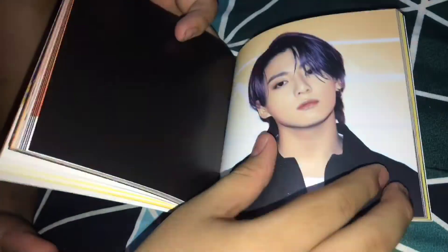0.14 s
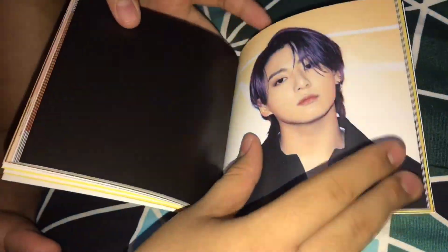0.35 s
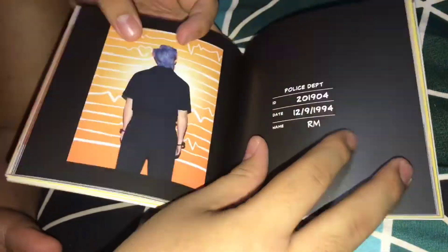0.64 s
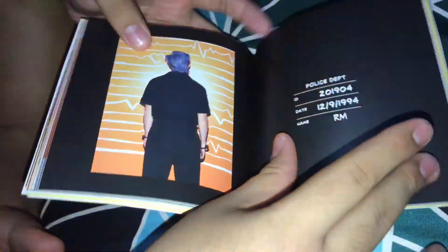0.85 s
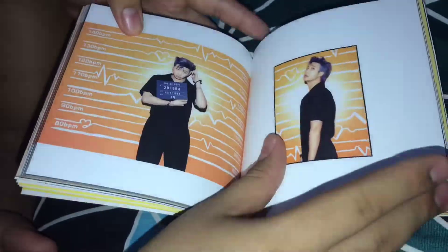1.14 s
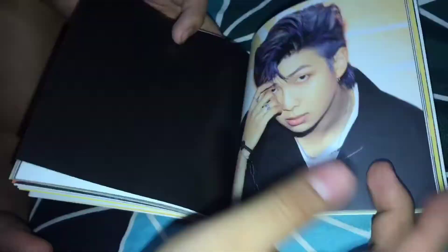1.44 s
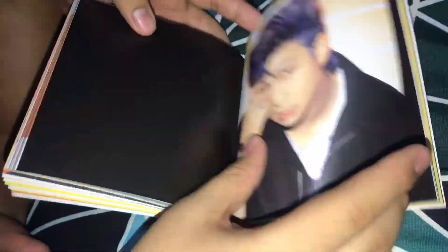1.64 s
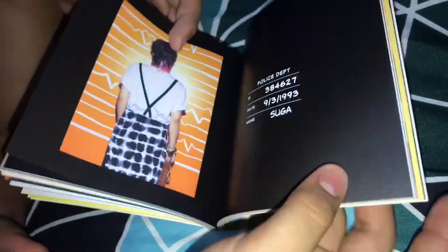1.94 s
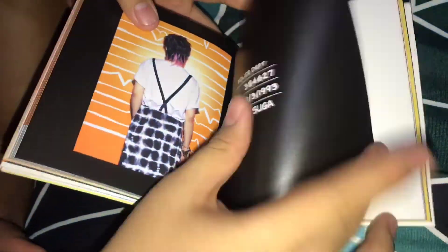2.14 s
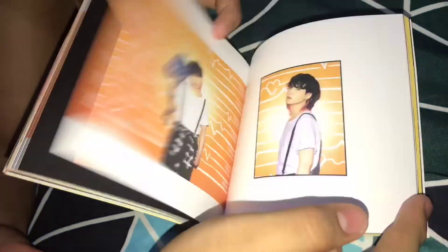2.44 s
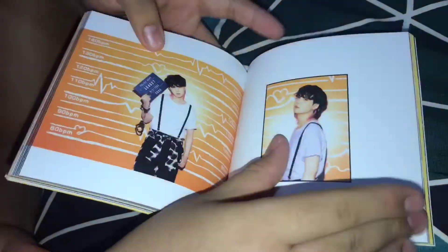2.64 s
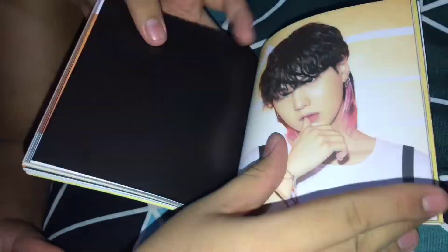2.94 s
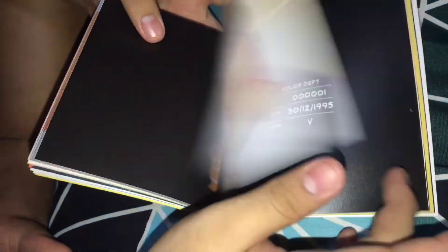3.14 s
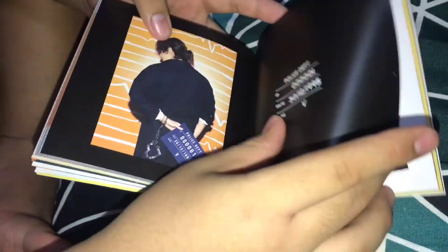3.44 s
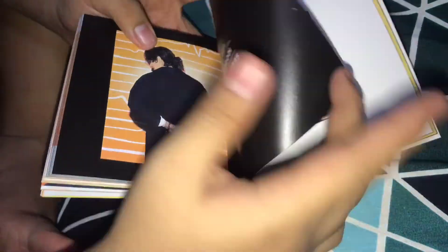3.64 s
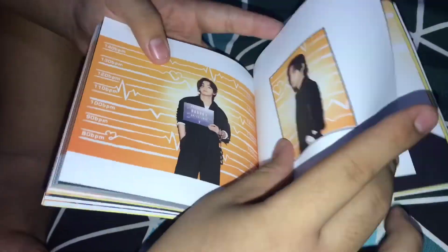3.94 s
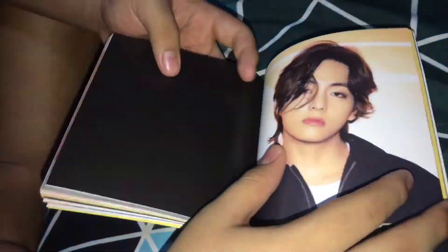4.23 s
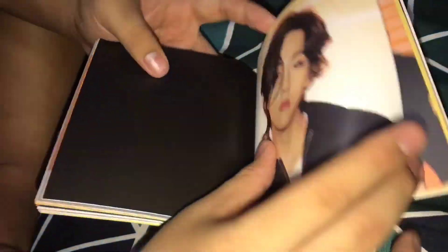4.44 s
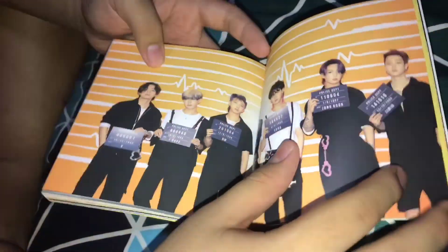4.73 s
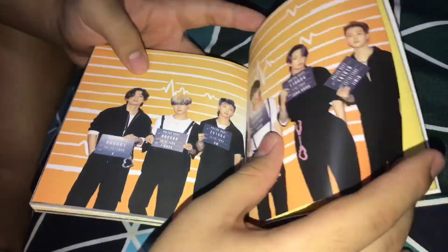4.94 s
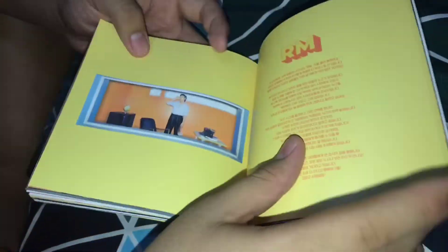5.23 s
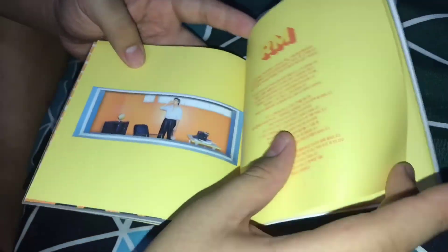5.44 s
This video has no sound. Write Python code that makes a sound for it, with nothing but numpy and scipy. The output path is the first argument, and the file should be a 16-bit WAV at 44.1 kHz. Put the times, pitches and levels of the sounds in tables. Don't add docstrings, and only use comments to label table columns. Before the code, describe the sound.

Stiff glossy book pages are flipped quickly by hand, with short rubs, crisp snaps and soft flops over a low fan rumble.

```python
import sys
import numpy as np
from scipy import signal
from scipy.fft import rfft, irfft
from scipy.io import wavfile
from scipy.ndimage import uniform_filter1d

SR = 44100
rng = np.random.default_rng(int(sys.argv[2]) if len(sys.argv) > 2 else 0)


def transcribe(signal):
    frames = np.atleast_2d(signal).T
    limited = np.clip(frames, -1, 1)
    pcm = np.round(limited * 32767).astype(np.int16)
    wavfile.write(sys.argv[1], SR, pcm)


def voltage_ratio(level):
    return 10 ** (np.asarray(level, float) / 20)


N = 245637

# centre_s, level_db, half_length_s, bend_db
THUMB_GRIPS = [(0.394, -46, .014, -1.5), (0.876, -46, .011, -2), (0.902, -47.5, 0.012, -15),
               (0.964, -44, .014, -1), (1.292, -44, .014, -9), (1.3, -55.5, .03, 0),
               (1.429, -51, .017, -2.5), (1.732, -48.5, 0.021, -10), (1.84, -47.5, 0.014, -18),
               (2.114, -45.5, .008, -5), (2.13, -50, .011, 0), (2.145, -43.5, 0.0085, -8),
               (2.156, -50, 0.0079, -9), (2.253, -43.5, 0.011, -18), (2.711, -47.5, 0.03, -3),
               (2.807, -52, .013, -7), (2.823, -49.5, .006, -1), (3.074, -42.5, .009, -3.5),
               (3.103, -52, .025, -2), (3.915, -47, .014, -8), (3.959, -44, .014, -8),
               (3.982, -54, 0.019, -4), (4.036, -55.5, 0.046, -10), (4.335, -49.5, 0.012, -0.5),
               (4.412, -55.5, 0.025, -3), (5.012, -51, 0.015, -1), (5.37, -46, 0.011, -3.5),
               (5.444, -51.5, 0.009, 0), (5.466, -51, 0.015, -1.5), (5.496, -47, 0.014, -6)]
# centre_s, level_db, half_length_s, bend_db
EDGE_FLICKS = [(.107, -48.5, 0.015, -12), (.43, -50, 0.014, -14), (0.471, -52, 0.027, -13),
               (0.505, -49.5, 0.0076, -15), (.516, -48, 0.0031, -15), (0.523, -47.5, .009, -16),
               (0.561, -52, 0.019, -20), (1, -44.5, 0.015, -20), (1.366, -53, .01, -23),
               (1.471, -51.5, .016, -13), (1.61, -44.5, 0.0078, -0.5), (1.644, -54, .012, 2.5),
               (1.66, -55, 0.019, -19), (1.784, -53, .007, -9), (1.939, -45.5, 0.0056, -16),
               (2.427, -52.5, 0.022, -10), (2.452, -53, 0.0046, -6), (2.493, -52.5, 0.015, -24),
               (2.745, -48, .005, -7), (2.843, -54, 0.032, -13), (3.398, -43.5, 0.004, -17),
               (3.611, -48, 0.0041, -12), (4.128, -56.5, 0.051, -9), (4.153, -50, .013, -19),
               (4.521, -47.5, 0.01, -8), (4.596, -52.5, .011, -17), (4.615, -49.5, 0.0043, -11),
               (4.627, -47, .003, -13), (4.877, -48, 0.011, -5), (5.092, -50, .014, -14)]
# centre_s, level_db, half_length_s, bend_db, sheet_hz
SHEET_CREASES = [(0.052, -44.5, 0.015, -24, 3170), (2.247, -48.5, .004, -10, 2900),
                 (2.867, -43, 0.013, -19, 3400), (3.168, -46.5, 0.016, 0.5, 3140),
                 (3.21, -49, .016, -30, 2960), (3.621, -41.5, 0.0061, -12, 2950),
                 (3.628, -48, .003, -16, 2910), (3.658, -52.5, .0065, -13, 2780),
                 (3.682, -44.5, 0.011, -6, 3120), (3.696, -44.5, .0065, -8, 2910),
                 (4.892, -48, 0.0044, -6, 2660), (5.035, -44.5, 0.0095, -12, 3200),
                 (5.113, -42.5, .011, -12, 3120), (5.151, -46, 0.017, -25, 3300),
                 (5.547, -47.5, 0.025, -6, 3080), (5.55, -50.5, .012, -7, 2700)]
# centre_s, level_db, half_length_s, bend_db, gloss_db
SKIN_SKIMS = [(.02, -54.5, 0.018, -15, -7), (0.402, -62, .01, 1, -5), (0.622, -54.5, 0.0077, -8, 1),
              (0.728, -58, .006, -19, -9), (0.871, -47.5, 0.024, -14, -11), (1.041, -60.5, 0.022, -3, -1.5),
              (1.411, -47.5, 0.014, -10, -6), (1.804, -56, .016, -5, -7), (1.99, -57, 0.0064, -2, -9),
              (2.201, -58.5, 0.015, -10, -6), (2.685, -46, .01, 0, -2.5), (2.767, -55, .014, -8, -13),
              (3.409, -49, 0.013, 1, -4), (3.501, -57.5, 0.0077, 5, -5), (3.555, -62.5, 0.012, 3, -2),
              (3.717, -53, 0.019, -9, -5), (4.174, -55, .0034, -18, -3), (4.199, -67.5, .009, -5, 7),
              (4.487, -50, 0.017, -12, -6.5), (4.498, -52.5, 0.0097, -13, -4), (4.972, -54.5, 0.016, 7, -6),
              (4.991, -60, 0.0077, 7, -9), (5.099, -53.5, .006, -22, 1), (5.187, -66.5, .004, 1, 9.5)]
# centre_s, level_db, half_length_s, flex_hz
PAGE_FLOPS = [(.051, -56.5, 0.016, 1300), (0.503, -54, 0.01, 1320), (.882, -53, 0.01, 1700),
              (0.894, -54, .013, 1390), (.964, -50.5, 0.013, 1530), (1.01, -58, 0.018, 1400),
              (2.153, -57, .01, 1650), (2.249, -43, 0.0025, 1490), (2.258, -59, .01, 1540),
              (2.716, -58, .019, 1410), (2.744, -53, 0.0088, 1310), (2.826, -52.5, 0.007, 1340),
              (3.172, -50, 0.013, 1350), (3.613, -44.5, 0.0035, 1690), (3.631, -44, .0034, 1680),
              (3.696, -43.5, 0.0085, 1260), (3.961, -53, 0.016, 1250), (4.495, -56, 0.0074, 1120),
              (4.608, -56, .004, 1140), (5.036, -53, 0.0086, 1230), (5.552, -42, 0.0097, 1110),
              (5.567, -44, 0.0034, 1150)]
# start_s, peak_db, ring_hz, decay_s
EDGE_SNAPS = [(0.049, -33, 2900, .0006), (0.384, -34, 2830, .0006), (1.603, -36, 2600, 0.00066),
              (2.244, -38, 1920, 0.00029), (3.614, -27, 2770, 0.00044), (3.6213, -37, 2800, .0005),
              (3.6333, -28, 2760, 0.00078), (3.9487, -32, 3250, .0005), (4.049, -24.5, 3000, 0.00046),
              (4.6114, -31.5, 3200, 0.00073), (1.043, -44, 6300, .0004), (5.252, -42, 2800, .0004),
              (5.0338, -36, 3080, 0.00035), (5.1526, -32.5, 3380, 0.00043)]
# time_s, level_db
FAN_PUSH = [(0.0, -36.5), (0.76, -36.5), (0.87, -42), (1.46, -35.5), (1.49, -47.5), (1.64, -35.5),
            (1.77, -43), (2.09, -34), (2.39, -42), (2.67, -34), (2.7, -41), (3.37, -38), (4.4, -40),
            (4.42, -42), (4.65, -35.5), (4.79, -40), (5.54, -36), (5.57, -47)]
# pitch_hz, level_db (per Hz)
RUMBLE_TONE = [(12, -46), (20, -18.5), (54, 4), (70, 10.5), (88, 2), (125, -25), (160, -62), (280, -120)]
# pitch_hz, level_db (per Hz)
HISS_TONE = [(65, -41), (110, 3.5), (308, -6), (497, -13), (626, -9.5), (735, -18), (878, -17.5),
             (2410, -20), (3150, -16), (3570, -27), (3900, -24.5), (6410, -34.5), (7650, -45.5),
             (9940, -56), (16800, -120)]
# pitch_hz,
# width_hz, boost_db
HOUSING_HUMPS = [(131, 32, -4.5), (300.6, 62, 5), (538, 220, 3), (870, 170, 6), (1260, 380, 5.5),
                 (2210, 96, 6), (2660, 190, 8.5), (2900, 140, 1.5), (3150, 230, 2.5), (3860, 180, 11),
                 (3900, 68, 3), (4420, 100, 7.5), (4600, 120, -3.5), (5200, 67, 3), (5600, 200, 5),
                 (6200, 270, 11), (6400, 89, 5)]

GRIP_HZ, FLICK_HZ, SKIM_HZ = 3170, 3340, 3200
GRIP_WIDE_HZ, FLICK_WIDE_HZ, CREASE_WIDE_HZ, SKIM_WIDE_HZ = 1630, 1400, 915, 1600
GRIP_GLOSS_DB, FLICK_GLOSS_DB, CREASE_GLOSS_DB = -10, -14.5, -24.5
BEND_HZ, GLOSS_HZ = 2165, 6400
THUD_DB = -8
SHUFFLE_DB, HISS_DB = -70, -49
GUST_DB, GUST_PER_S = 1.5, 10.0
TOP_HZ = 7430


def unit(x):
    return x / np.sqrt(np.mean(x ** 2))


def band(x, lo_hz, hi_hz):
    sos = signal.butter(2, [lo_hz, hi_hz], "bandpass", fs=SR, output="sos")
    return unit(signal.sosfilt(sos, x))


def ring(x, hz, width_hz):
    return signal.lfilter(*signal.iirpeak(hz, hz / width_hz, fs=SR), x)


def walk(rate):
    k = int(SR / rate)
    once = uniform_filter1d(rng.standard_normal(N), k)
    return unit(uniform_filter1d(once, k))


def coloured(points, humps=()):
    f = np.fft.rfftfreq(N, 1 / SR) + 1
    hz, db = np.transpose(points)
    shape = np.interp(np.log(f), np.log(hz), db)
    for centre, width, boost in humps:
        shape = shape + boost / (1 + (2 * (f - centre) / width) ** 2)
    spectrum = rfft(rng.standard_normal(N)) * voltage_ratio(shape)
    return unit(irfft(spectrum, N))


def stretch(s, length):
    first = max(int((s - 0.07) * SR), 0)
    last = min(int((s + 0.07) * SR), N)
    i = np.arange(first, last)
    swell = np.exp(-np.abs((i / SR - s) / max(length, 0.003)) ** 2.5)
    return i, swell


def under(x, swell):
    return x * swell * np.sqrt(np.sum(swell ** 2) / np.sum((x * swell) ** 2))


def touches():
    found = []
    for s, db, length, bend in THUMB_GRIPS:
        found.append((s, db, length, GRIP_HZ, GRIP_WIDE_HZ, bend, GRIP_GLOSS_DB))
    for s, db, length, bend in EDGE_FLICKS:
        found.append((s, db, length, FLICK_HZ, FLICK_WIDE_HZ, bend, FLICK_GLOSS_DB))
    for s, db, length, bend, hz in SHEET_CREASES:
        found.append((s, db, length, hz, CREASE_WIDE_HZ, bend, CREASE_GLOSS_DB))
    for s, db, length, bend, gloss in SKIN_SKIMS:
        found.append((s, db, length, SKIM_HZ, SKIM_WIDE_HZ, bend, gloss))
    return found


def slips(rate, spread_db, smooth):
    hit = rng.random(N) < rate / SR
    size = voltage_ratio(spread_db * rng.exponential(size=N))
    sign = np.sign(rng.standard_normal(N))
    slide = rng.standard_normal(N)
    return unit(unit(hit * sign * size) + smooth * slide)


def rubs():
    drive = slips(3500.0, 1.2, 0.99) * voltage_ratio(2.2 * walk(230.0))
    bend = ring(ring(drive, BEND_HZ, 980.0), BEND_HZ, 980.0)
    gloss = ring(band(drive[::-1], 5180.0, 6550.0), GLOSS_HZ, 1800.0)
    out = np.zeros(N)
    for s, db, length, hz, wide_hz, bend_db, gloss_db in touches():
        i, swell = stretch(s, length)
        j = rng.integers(0, N - 8192) + i - i[0]
        broad = ring(ring(drive[j], hz, wide_hz), hz, wide_hz)
        sheet = unit(broad) + 0.74 * unit(ring(drive[j], hz * 0.856, 340.0))
        rub = under(sheet, swell)
        rub += voltage_ratio(bend_db) * under(bend[j], swell)
        rub += voltage_ratio(gloss_db) * under(gloss[j], swell)
        out[i] += voltage_ratio(db) * rub
    return out


def flops():
    drive = rng.standard_normal(N)
    thud = band(drive[::-1], 300.0, 1000.0)
    out = np.zeros(N)
    for s, db, length, hz in PAGE_FLOPS:
        i, swell = stretch(s, length)
        flex = ring(ring(drive[i], hz, 460.0), hz, 460.0)
        out[i] += voltage_ratio(db) * (under(flex, swell) + voltage_ratio(THUD_DB) * under(thud[i], swell))
    return out


def snaps():
    out = np.zeros(N)
    t = np.arange(400) / SR
    for s, db, hz, decay in EDGE_SNAPS:
        fade = np.exp(-t / decay) * (1 - np.exp(-t / 0.0001))
        tick = -np.sin(2 * np.pi * hz * t) * fade
        tick += 0.12 * np.sin(2 * np.pi * 6200.0 * t) * np.exp(-t / 0.00054)
        i = int(s * SR)
        out[i:i + len(t)] += voltage_ratio(db) * tick / np.abs(tick).max()
    return out


def shuffle():
    slide = rng.standard_normal(N)
    thin = band(slide, 4800.0, 6500.0)
    full = band(slide[::-1], 2400.0, 4300.0)
    return voltage_ratio(SHUFFLE_DB + 1.2 * walk(3.9)) * (thin + 1.87 * full)


def bed_echo(book):
    t = np.arange(int(0.06 * SR)) / SR
    tail = rng.standard_normal(len(t)) * np.exp(-np.log(1000) * t / 0.017) * (t > 0.001)
    return voltage_ratio(-15) * signal.fftconvolve(book, tail / np.sqrt(np.sum(tail ** 2)))[:N]


def rumble():
    x = coloured(RUMBLE_TONE)
    swell = np.sqrt(uniform_filter1d(x ** 2, int(0.048 * SR)) + 0.044)
    push_db = np.interp(np.arange(N) / SR, *np.transpose(FAN_PUSH))
    return unit(x / swell ** 0.75) * voltage_ratio(push_db + GUST_DB * walk(GUST_PER_S))


def hiss():
    return voltage_ratio(HISS_DB + 0.13 * walk(2.0)) * coloured(HISS_TONE, HOUSING_HUMPS)


def scene():
    book = rubs() + flops() + snaps()
    mix = book + bed_echo(book) + shuffle() + rumble() + hiss()
    return mix[None]


def top_cut(x):
    return signal.sosfilt(signal.butter(12, 7800, fs=SR, output="sos"), x)


def record(dry):
    steep_cut = signal.ellip(10, 1, 62, TOP_HZ, fs=SR, output="sos")
    mix = signal.sosfilt(steep_cut, dry)
    return top_cut(mix)


dry = scene()
out = record(dry)
transcribe(out)
```